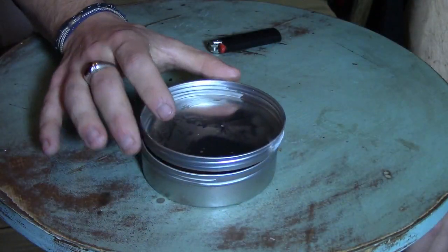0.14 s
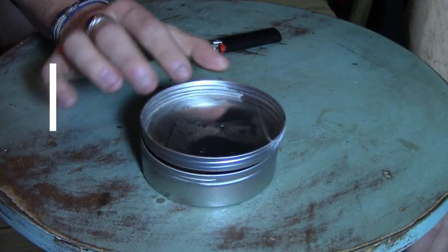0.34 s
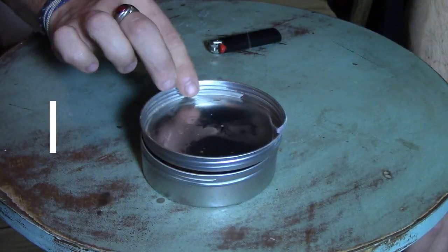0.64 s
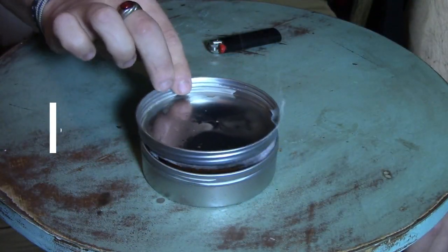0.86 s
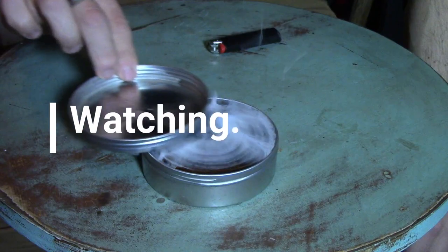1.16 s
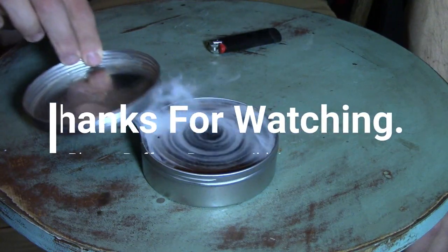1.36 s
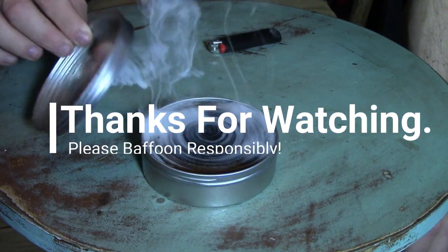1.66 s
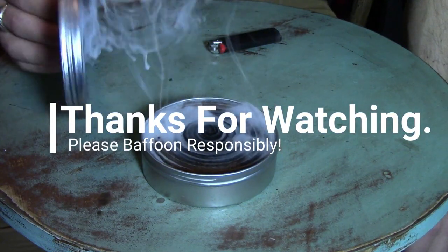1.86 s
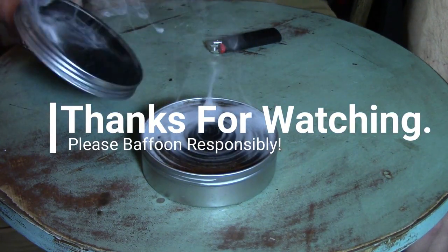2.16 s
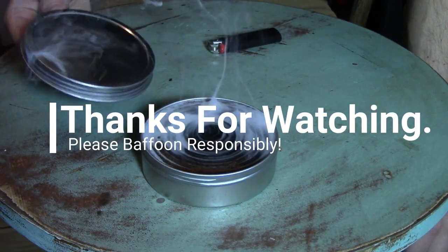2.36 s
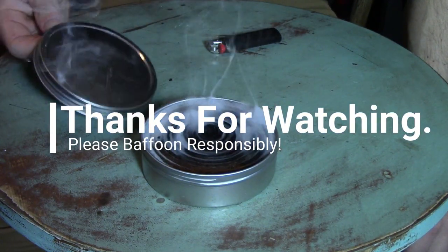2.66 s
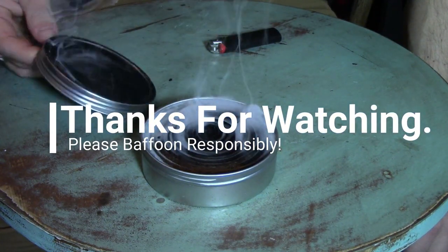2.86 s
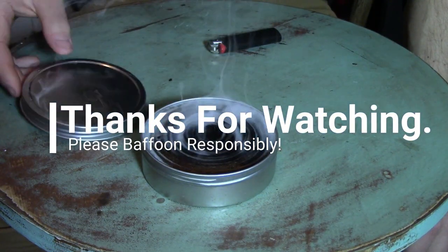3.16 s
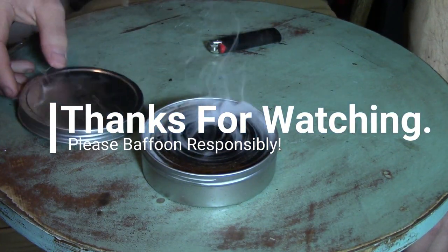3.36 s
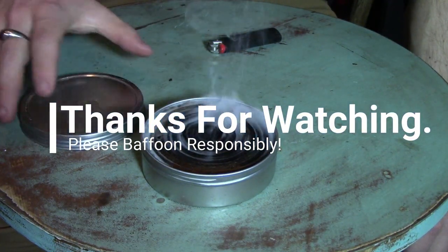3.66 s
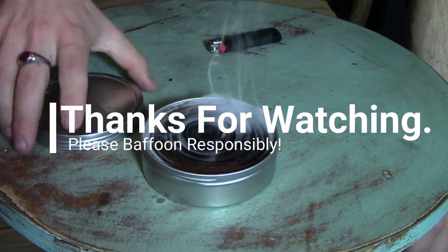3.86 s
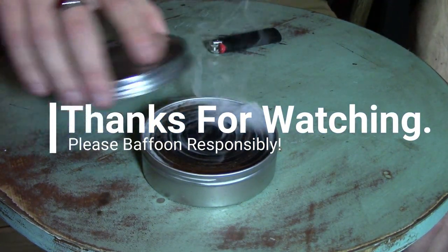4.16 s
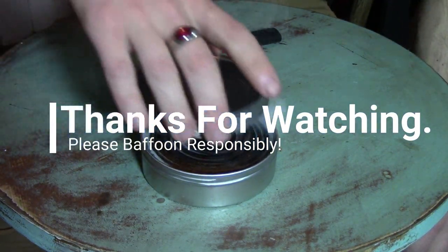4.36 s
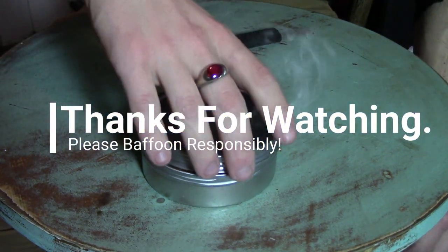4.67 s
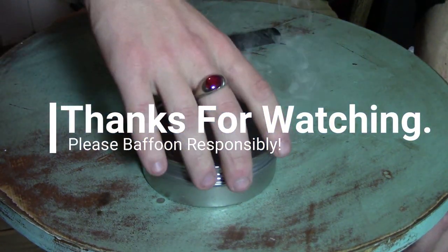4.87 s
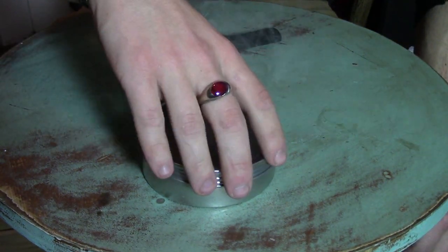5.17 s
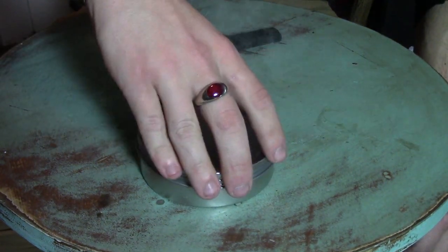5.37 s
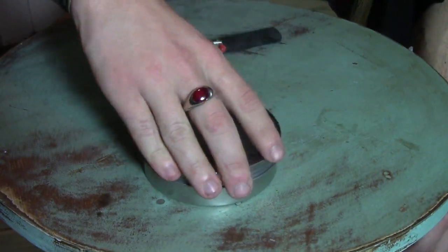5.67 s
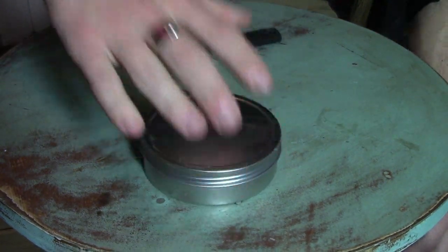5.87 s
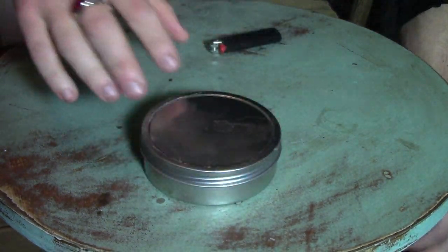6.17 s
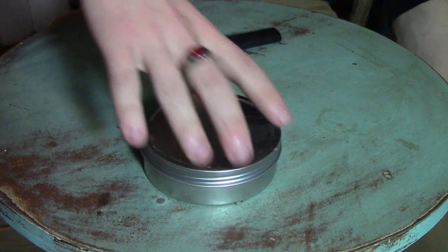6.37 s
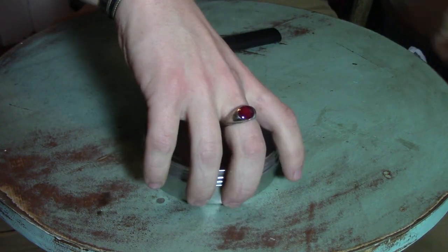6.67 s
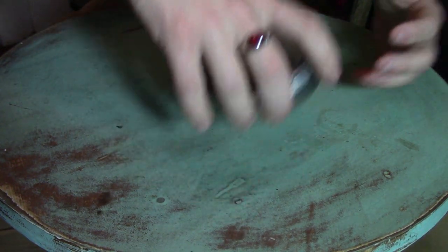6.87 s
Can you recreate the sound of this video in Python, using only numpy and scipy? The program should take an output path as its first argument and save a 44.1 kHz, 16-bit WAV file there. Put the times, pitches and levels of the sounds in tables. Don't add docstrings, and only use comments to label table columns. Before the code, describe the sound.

A low, slightly wavering machine hum and soft microphone hiss continue throughout, in a small dry room heard from close up. A faint finger knock comes at about 0.35 seconds. Near 1.0 a thin metal lid gives a light clink, touches again softly, then scrapes brightly along the rim from 1.15 to a sharper, ringing clink at 1.4. Wood creaks once, short and pitched, around 1.6 to 1.7. Tiny snaps tick at 2.0 and 2.3. A firm clink rings at about 2.95, and the strongest, landing on the wooden table, at 3.65, with a faint low boom. Soft finger knocks follow from 4.2; a dull, muted press sounds at 4.9. More taps lead to a heavy, soft thump at 5.65 with low floor weight. Skin rubs off grainily at 6.0, and muffled bumps at 6.75 and 6.9 close it.

```python
import sys
import numpy as np
from scipy import signal
from scipy.fft import rfft, irfft, next_fast_len
from scipy.io import wavfile
from scipy.ndimage import uniform_filter1d

SR = 44100
rng = np.random.default_rng(int(sys.argv[2]) if len(sys.argv) > 2 else 0)


def to_linear_factor(level_db):
    exponent = np.asarray(level_db, float) / 20
    return 10 ** exponent


def store_pcm(level_fs):
    pcm = np.round(np.clip(level_fs, -1, 1) * 32767).astype(np.int16)
    wavfile.write(sys.argv[1], SR, np.atleast_2d(pcm).T)


N = 309743

# f/Hz, left level/dB, right level/dB, right phase/rad, waver/dB
HUM = [(21, -50, -52, 2.71, 6), (53.2, -51, -61.5, 0.1, 3.5), (60, -66.5, -67.5, 0.6, 7.5),
       (120.3, -71, -66, .1, 4), (1201, -71.5, -70.5, 0.053, 3), (1338, -74, -74.5, .1, 0.5),
       (1470, -76.5, -71.5, .1, 0.5)]
# f/Hz, density/(dB per Hz)
HISS = [(20, -18), (60, -12), (85, -14.5), (120, -27.5), (160, -16.5), (400, -24), (900, -26),
        (1300, -28.5), (1900, -30), (4000, -33), (8000, -35), (16000, -41.5)]
# f/Hz, likeness/1
HISS_LIKENESS = [(60, -0.47), (240, 0.35), (950, 0.075), (3770, 0.079), (15000, -0.049)]
# f/Hz, L-R level/dB
HISS_PAN = [(60, 9.5), (240, -0.5), (950, 0.5), (3770, 0.0), (15000, 0)]
# t/s, level/dB, body f/Hz, click level/dB, L-R level/dB
KNOCKS = [(0.354, -41.5, 430, 4.5, 3), (2.879, -49, 785, -14, 2), (3.164, -39.5, 935, -0.5, 4),
          (4.17, -37.5, 1000, -22, 3.5), (4.539, -39, 320, -1.5, -9), (4.962, -35.5, 673, -5, 1),
          (5.066, -41.5, 550, -8, -2), (5.19, -44, 970, -1, 5), (5.465, -39, 815, -12, 5),
          (5.499, -48, 590, -14, 1.0), (5.624, -38.5, 294, -15, 4.0), (5.644, -26, 532, -14, -1),
          (6.016, -42, 1190, -12, 2.5), (6.76, -46, 457, 2.5, 5), (6.923, -37, 930, -1, 1.5),
          (4.194, -62, 950, -6, 2)]
# f/Hz, density/(dB per Hz)
CRACK = [(100, -37), (300, -27), (600, -4), (1500, -3), (2700, -4.5), (5000, -8.5), (8000, -20.5),
         (12000, -18.5), (16000, -37)]
# f/Hz, density/(dB per Hz)
SIZZLE = [(3000, -41), (6000, -10), (9000, 3), (14000, -3.5), (16000, -14)]
# t/s, ring gain/dB, crack level/dB, crack t60/s, spray level/dB
CLINKS = [
    (0.989, 3.5, -32, 0.087, -41),
    (1.3823, 3.5, -24, 0.057, -25),
    (2.958, -0.5, -17.5, 0.096, -38),
    (3.6546, 1, -13.5, 0.094, -25),
    (4.8791, 0.5, -31, 0.044, -67),
    (1.132, -1, -48, 0.069, -60),
]
SLIDING_HZ = [590, 1394, 1992, 2641, 2716, 3343, 3382, 4161, 5015, 5179, 5846, 6078, 6926, 7035, 8144, 9332]
# level/dB, t60/s
SLIDING_MODES = [(-50, 0.087), (-35, 0.03), (-61, 0.31), (-74, 0.19), (-50, 0.26), (-52.5, 0.22),
                 (-62, 0.16), (-49, 0.098), (-51, 0.046), (-40, 0.039), (-46, 0.1), (-51, 0.21),
                 (-57, 0.06), (-44, 0.064), (-50, 0.18), (-46, 0.07)]
ON_RIM_HZ = [903, 1342, 1500, 1976, 2472, 2596, 2671, 3130, 3328, 3491, 4177, 4950, 5074, 5171, 5352, 5857,
             5997, 6255, 6914, 7018, 7500, 8131, 9312, 10123]
# level/dB, t60/s
ON_RIM_MODES = [(-32, 0.091), (-49.5, 0.39), (-21.5, 0.015), (-35.5, 0.25), (-44, 0.36), (-61, 0.46),
                (-33, 0.35), (-86, 0.28), (-41, 0.27), (-41.5, 0.37), (-30.5, 0.1), (-33, 0.12),
                (-46, 0.16), (-20, 0.064), (-54, 0.21), (-41, 0.2), (-41, 0.24), (-54, 0.28), (-39, 0.13),
                (-43, 0.17), (-34.5, 0.13), (-41, 0.2), (-36, 0.13), (-35, 0.11)]
IN_HAND_HZ = [350, 767, 951, 1227, 1340, 1404, 1585, 1906, 2012, 2030, 2151, 2322, 2649, 2690, 3393, 4132,
              4935, 5098, 5165, 6101, 6262, 7465, 8136, 10919]
# level/dB, t60/s
IN_HAND_MODES = [(-44.5, 0.3), (-35, 0.14), (-33, 0.38), (-55, 0.69), (-30.5, 0.25), (-28, 0.25),
                 (-44, 0.46), (-21, 0.039), (-21, 0.18), (-34, 0.42), (-31.5, 0.24), (-37, 0.31),
                 (-22.5, 0.2), (-37, 0.47), (-16, 0.052), (-22, 0.12), (-47, 0.16), (-17.5, 0.047),
                 (-27, 0.094), (-45, 0.32), (-61, 0.28), (-41, 0.14), (-44, 0.2), (-65, 0.15)]
ON_TABLE_HZ = [631, 881, 951, 920, 1022, 1518, 1900, 963, 2015, 2332, 2665, 2694, 3334, 4192, 4389, 4949,
               5122, 5504, 6080, 6273, 6909, 8061, 8138, 8500, 9382, 9528, 10768, 10928]
# level/dB, t60/s
ON_TABLE_MODES = [(-28.5, 0.14), (-28.5, 0.27), (-9.5, 0.11), (-21, 0.17), (-12, 0.085), (-46, 0.16),
                  (-43, 0.45), (-28.5, 0.27), (-16.5, 0.12), (-13, 0.036), (-22, 0.17), (-32.5, 0.43),
                  (-36.5, 0.27), (-26, 0.21), (-36, 0.27), (-17, 0.086), (-16.5, 0.15), (-42, 0.22),
                  (-39, 0.36), (-32, 0.17), (-53, 0.18), (-40.5, 0.057), (-35, 0.28), (-78, 0.37),
                  (-44, 0.14), (-35, 0.28), (-63.5, 0.41), (-65, 0.28)]
PRESSED_HZ = [680, 868, 964, 1430, 1700, 2016, 2678, 2750, 3309, 4976]
# level/dB, t60/s
PRESSED_MODES = [(-61, 0.18), (-53, 0.51), (-43, 0.29), (-40.5, 0.036), (-32, 0.019), (-47.5, 0.17),
                 (-52, 0.21), (-52, 0.24), (-50, 0.077), (-64, 0.04)]
TOUCHED_HZ = [911, 1460, 1978, 2690, 3340, 4153, 5184, 6054]
# level/dB, t60/s
TOUCHED_MODES = [(-56.5, 0.31), (-41.5, 0.027), (-55.5, 0.28), (-64, 0.22), (-75, 0.2), (-60, 0.24),
                 (-62, 0.28), (-59, 0.28)]
# peak t/s, level/dB, fade t60/s
SCRAPE = [
    (1.15, -50.5, .1),
    (1.201, -44.5, 0.086),
    (1.279, -37.5, 0.3),
]
# f/Hz, width/Hz, level/dB
DRAGGED_MODES = [(2660, 40, -8), (1990, 40, -13), (3340, 30, -4), (4170, 34, -4), (5090, 46, 0),
                 (6090, 32, -6), (7030, 38, -8), (8180, 180, -11), (9320, 41, -8), (10200, 37, -17),
                 (10600, 53, -15), (10900, 80, -20), (11600, 33, -11), (12000, 44, -17)]
# t/s, force/dB, slip rate/Hz, roughness/dB
CREAK = [
    (1.57, -60, 460, -6),
    (1.588, -45, 495, 0),
    (1.624, -44, 570, 4),
    (1.638, -32, 630, 2),
    (1.67, -30, 634, -2),
    (1.716, -31, 631, -6),
    (1.735, -54, 628, -6),
]
# f/Hz, width/Hz, level/dB
WOOD = [(513, 105, -2), (633, 12, -43), (772, 158, -0.5), (1127, 68, -12.5), (1230, 57, -16),
        (1520, 55, -21.5), (1750, 46, -23), (2005, 100, -19), (2410, 80, -30)]
# t/s, level/dB, f/Hz, t60/s
BOOMS = [
    (2.956, -46, 121, 0.12),
    (3.655, -42, 108, 0.22),
    (5.643, -56, 75.5, 0.22),
    (6.76, -37.5, 58.3, 0.28),
    (1.735, -42.5, 632, 0.65),
    (2.86, -53, 715, .3),
    (3.2, -60, 965, .6),
    (3.31, -59, 615, .5),
    (3.29, -59, 311, .5),
]
# t/s, level/dB
TICKS = [
    (2.0244, -44),
    (2.32, -40),
]
# peak t/s, level/dB, fade t60/s
PALM = [
    (5.468, -54.5, 0.076),
    (5.5, -53, .1),
    (5.628, -52, 0.081),
    (5.646, -40, 0.091),
]
# f/Hz, density/(dB per Hz)
PALM_COLOUR = [(100, -11), (250, -1.5), (700, 1), (1500, -9.5), (2200, -20), (5000, -27), (16000, -60)]
# peak t/s, level/dB, fade t60/s
THUDS = [
    [(5.652, -29, 0.21), (5.832, -48, 0.098), (5.962, -40.5, 0.37)],
    [(6.774, -37, 0.32), (6.908, -45.5, .7)],
]
# from t/s, to t/s
THUD_SPANS = [(5.58, 6.1), (6.72, 7.02)]
# f/Hz, density/(dB per Hz)
THUD_COLOUR = [(15, -16), (30, -5), (110, -4.5), (180, -19), (400, -24), (900, -63)]
# peak t/s, level/dB, fade t60/s
RUB = [
    (5.986, -50.5, 0.1),
    (6.018, -37.5, 0.15),
]
# f/Hz, density/(dB per Hz)
RUB_COLOUR = [(410, -49), (700, -17), (1200, -1), (2100, -13.5), (4490, -11), (5920, -19), (7110, -14.5),
              (10700, -10.5), (16000, -42)]
# f/Hz, t60/s
ROOM = [(100, 0.87), (500, 0.21), (1500, .28), (4000, 0.24), (10000, 0.19)]

LID_STATES = [(SLIDING_HZ, SLIDING_MODES), (ON_RIM_HZ, ON_RIM_MODES), (IN_HAND_HZ, IN_HAND_MODES),
              (ON_TABLE_HZ, ON_TABLE_MODES), (PRESSED_HZ, PRESSED_MODES), (TOUCHED_HZ, TOUCHED_MODES)]


def evened(x):
    return x / np.sqrt(np.mean(x ** 2) + 1e-20)


def read(points, hz):
    f, value = np.transpose(points)
    return np.interp(np.log(hz + 1), np.log(f + 1), value)


def add(mix, start_s, sound, pan_db=0):
    part = mix[:, round(start_s * SR):][:, :len(sound)]
    part += sound[:part.shape[1]] * to_linear_factor([[pan_db / 2], [-pan_db / 2]])


def coloured(x, points, tilt_db=0):
    hz = np.fft.rfftfreq(len(x), 1 / SR)
    gain_db = read(points, hz) + tilt_db * np.log2((hz + 50) / 1500)
    return evened(irfft(rfft(x) * to_linear_factor(gain_db), len(x)))


def resonate(x, hz, width_hz):
    turn = np.exp(2j * np.pi * np.cumsum(hz * np.ones(len(x))) / SR)
    r = np.exp(-np.pi * width_hz / SR)
    return 2 * (turn * signal.lfilter([1 - r], [1, -r], x / turn)).real


def strokes(span_s, rows, swell_db_per_s):
    t = np.arange(*span_s, 1 / SR)
    peak_s, db, t60_s = np.transpose(rows)[:, :, None]
    since = t - peak_s
    return to_linear_factor(db + np.minimum(swell_db_per_s * since, -60 * since / t60_s)).sum(0)


def slips(count, per_s, spread_db):
    clicks = (rng.random(count) < per_s / SR) * to_linear_factor(spread_db * rng.standard_normal(count))
    return clicks * rng.standard_normal(count)


def hum():
    t, out = np.arange(N) / SR, np.zeros((2, N))
    for hz, left_db, right_db, phase, waver_db in HUM:
        waver_hz = np.geomspace(.4, 5, 9)
        waver = evened(sum(np.sin(2 * np.pi * (f * t[::64] + rng.random())) for f in waver_hz))
        level_db = np.array([[left_db], [right_db]]) + waver_db * np.repeat(waver, 64)[:N]
        angle = 2 * np.pi * hz * t - np.array([[0], [phase]])
        out += np.sqrt(2) * to_linear_factor(level_db) * np.sin(angle)
    return out


def hiss():
    frames, hz = N // 256 + 5, np.fft.rfftfreq(1024, 1 / SR)
    a, b, c, d, patches = rng.standard_normal((frames, 513, 5)).T
    patches = evened(uniform_filter1d(uniform_filter1d(patches, 10, 0), 12, 1))
    same = np.clip(read(HISS_LIKENESS, hz), -1, 1)[:, None]
    left = a + 1j * b
    right = same * left + np.sqrt(1 - same ** 2) * (c + 1j * d)
    pan_db = np.array([[.5], [-.5]]) * read(HISS_PAN, hz)
    level_db = (read(HISS, hz) + pan_db)[:, :, None] + 1.1 * patches
    noise = signal.istft(np.array([left, right]) * to_linear_factor(level_db), nperseg=1024, noverlap=768)[1]
    return to_linear_factor(-52.5) * evened(noise[:, :N])


def knocks():
    t, mix = np.arange(SR // 3) / SR, np.zeros((2, N))
    body_t60_s, scuff_t60_s, contact_s = 0.029, .035, 0.002
    for s, db, hz, click_db, pan_db in KNOCKS:
        body = np.sin(2 * np.pi * hz * t) * to_linear_factor(-60 * t / body_t60_s)
        scuff = coloured(rng.standard_normal(len(t)), CRACK, -8) * to_linear_factor(click_db - 60 * t / scuff_t60_s)
        add(mix, s, to_linear_factor(db) * (body + scuff) * (1 - np.exp(-t / contact_s)), pan_db)
    return mix


def ring(hz, modes, twin_db=-8):
    hz = np.array(hz)[:, None]
    db, t60_s = np.transpose(modes)[:, :, None]
    t = np.arange(SR // 2) / SR
    sign = rng.choice([-1, 1], (len(hz), 1))
    apart = .004 * (2 * rng.random((len(hz), 1)) - 1)
    pair = np.sin(2 * np.pi * hz * t) + to_linear_factor(twin_db) * np.sin(2 * np.pi * hz * (1 + apart) * t)
    return (sign * pair * to_linear_factor(db - 60 * t / np.clip(t60_s, .02, .7))).sum(0)


def clinks():
    t, mix = np.arange(SR // 2) / SR, np.zeros((2, N))
    hard_blow_db, tilt_db_per_db, spray_t60_s = -12.5, 0.25, .03
    for (s, db, crack_db, t60_s, spray_db), (hz, modes) in zip(CLINKS, LID_STATES):
        noise = rng.standard_normal(len(t))
        tilt_db = tilt_db_per_db * (crack_db - hard_blow_db)
        crack = coloured(noise, CRACK, tilt_db) * to_linear_factor(crack_db - 60 * t / max(t60_s, .005))
        crack *= 1 + .6 * np.exp(-t / .0015)
        spray = coloured(noise, SIZZLE) * to_linear_factor(spray_db - 60 * t / spray_t60_s)
        contact_s = .0002 * to_linear_factor(-.4 * (spray_db + 35))
        blow = (1 - np.exp(-t / contact_s)) * (to_linear_factor(db) * ring(hz, modes) + crack + spray)
        muffle_hz = 18000 * to_linear_factor(.66 * min(spray_db + 48, 0))
        muffle = signal.butter(3, muffle_hz, fs=SR, output="sos")
        add(mix, s, signal.sosfilt(muffle, blow), 1.7)
    return signal.sosfilt(signal.butter(2, 340, "high", fs=SR, output="sos"), mix)


def scrape():
    mix, span_s = np.zeros((2, N)), (1.14, 1.375)
    press = strokes(span_s, SCRAPE, swell_db_per_s=990)
    force = slips(len(press), 2700, 1.8)
    lid = sum(to_linear_factor(db) * resonate(force, hz, 2 * width_hz) for hz, width_hz, db in DRAGGED_MODES)
    add(mix, span_s[0], to_linear_factor(-2) * press * evened(lid))
    return mix


def creak():
    s, *columns = np.transpose(CREAK)
    t = np.arange(s[0], s[-1], 1 / SR)
    db, per_s, rough_db = [np.interp(t, s, column) for column in columns]
    wobble = evened(uniform_filter1d(rng.standard_normal((2, len(t))), size=300))
    force = to_linear_factor(db) * signal.windows.tukey(len(t), .1)
    angle = 2 * np.pi * np.cumsum(per_s * (1 + .008 * wobble[1])) / SR
    tone = force * to_linear_factor(.5 + 1.5 * wobble[0]) * np.sin(angle)
    rough = to_linear_factor(rough_db) * rng.standard_normal(len(t))
    shake = np.pad(force * (rough + evened(tone)), (0, SR // 3))
    wood = 0
    for hz, width_hz, mode_db in WOOD:
        wood = wood + to_linear_factor(mode_db) * evened(resonate(resonate(shake, hz, 3 * width_hz), hz, width_hz))
    mix = np.zeros((2, N))
    add(mix, s[0], tone)
    add(mix, s[0], to_linear_factor(-39) * wood)
    return mix


def booms():
    t, mix = np.arange(SR // 3) / SR, np.zeros((2, N))
    fade = signal.windows.tukey(len(t), .05)
    for s, db, hz, t60_s in BOOMS:
        add(mix, s, -np.sin(2 * np.pi * hz * t) * to_linear_factor(db - 60 * t / t60_s) * fade, 3.5)
    return mix


def ticks():
    t, mix = np.arange(SR // 3) / SR, np.zeros((2, N))
    for s, db in TICKS:
        snap = evened(np.diff(rng.standard_normal(len(t) + 2), n=2))
        add(mix, s, to_linear_factor(db + 2 - 60 * t / .008) * snap)
    return mix


def palm():
    mix, span_s = np.zeros((2, N)), (5.4, 5.8)
    press = strokes(span_s, PALM, swell_db_per_s=800)
    add(mix, span_s[0], press * coloured(rng.standard_normal(len(press)), PALM_COLOUR), 3)
    return mix


def thuds():
    mix = np.zeros((2, N))
    for span_s, rows in zip(THUD_SPANS, THUDS):
        press = strokes(span_s, rows, swell_db_per_s=620)
        floor = coloured(rng.standard_normal(len(press)), THUD_COLOUR)
        add(mix, span_s[0], to_linear_factor(-8) * press * floor, 4.5)
    return mix


def rub():
    mix, span_s = np.zeros((2, N)), (5.96, 6.14)
    press = strokes(span_s, RUB, swell_db_per_s=2700)
    add(mix, span_s[0], press * coloured(slips(len(press), 3000, 2.1), RUB_COLOUR), 1.5)
    return mix


def room():
    taps = np.zeros((3, SR // 2))
    at = np.arange(130, SR // 2 - 20, 20)
    at = at + rng.integers(0, 20, (3, len(at)))
    np.put_along_axis(taps, at, rng.choice([-1., 1.], at.shape), 1)
    hz, t, z = signal.stft(taps[:2] + 1.2 * taps[2], SR, nperseg=256)
    tail = signal.istft(z * to_linear_factor(-60 * t / read(ROOM, hz)[:, None]), SR, nperseg=256)[1]
    return tail / np.linalg.norm(tail[0])


def scene():
    lid_and_hands = clinks() + knocks() + ticks() + scrape() + rub()
    floor_and_wood = thuds() + creak() + booms()
    taps = room()
    bed = hum() + hiss()
    near = lid_and_hands + floor_and_wood + palm()
    room_db, port_lag_s = -5, 4.5e-5
    near = near + to_linear_factor(room_db) * signal.fftconvolve(near, taps, axes=1)[:, :N]
    size = next_fast_len(N)
    late = np.exp(-2j * np.pi * np.fft.rfftfreq(size, 1 / SR) * np.array([[0], [port_lag_s]]))
    return irfft(rfft(near, size) * late, size)[:, :N] + bed


def low_pass(x):
    return signal.sosfilt(signal.butter(12, 16530, fs=SR, output="sos"), x)


def record(dry):
    squeezed = np.clip(1.2 * np.tanh(dry / 1.2), -1, 1)
    edge = signal.firwin(255, 15950, window=("kaiser", 9), fs=SR)
    limited = signal.oaconvolve(squeezed, edge[None], "same")
    return low_pass(limited)


dry = scene()
out = record(dry)
store_pcm(out)
```